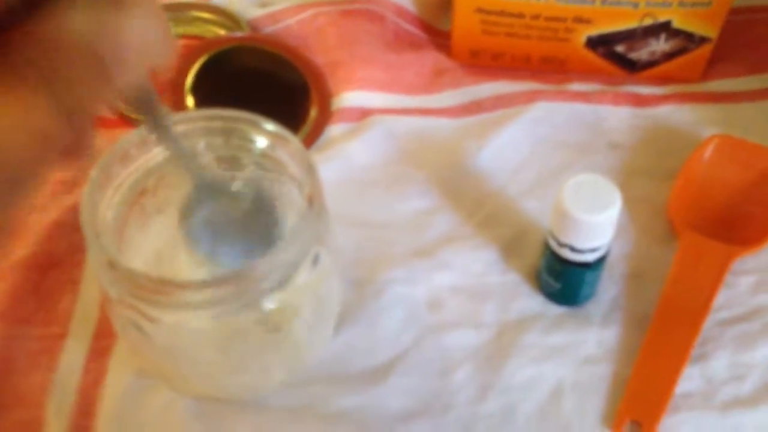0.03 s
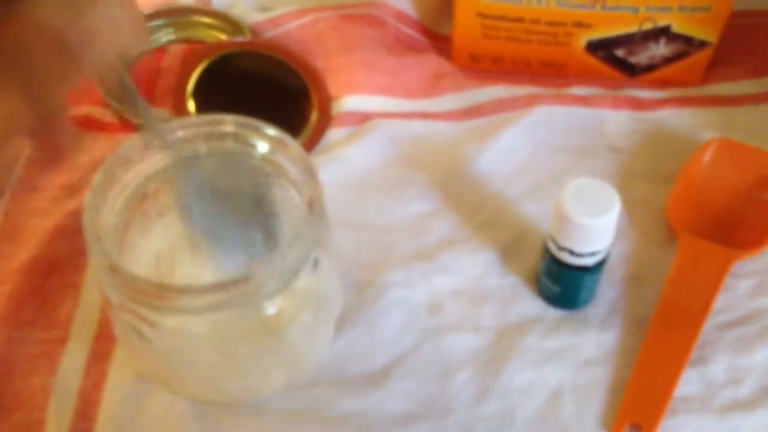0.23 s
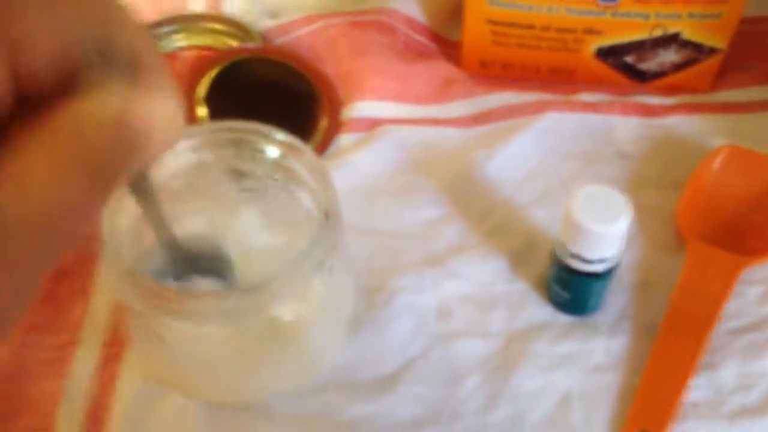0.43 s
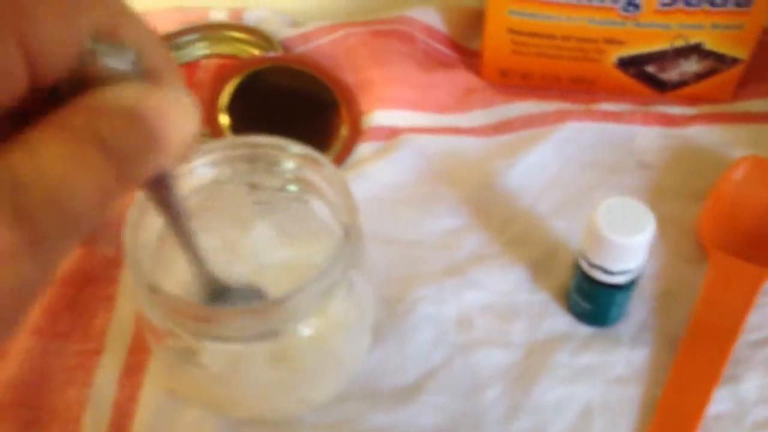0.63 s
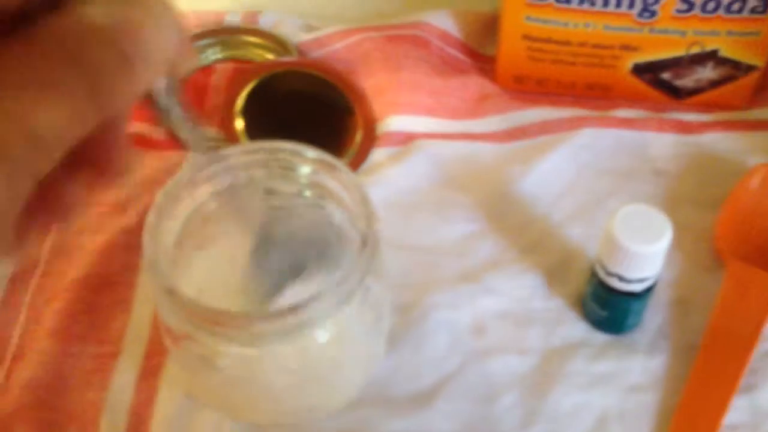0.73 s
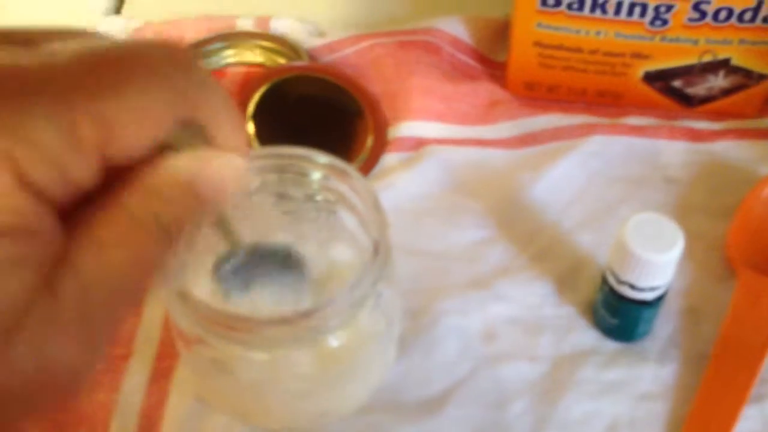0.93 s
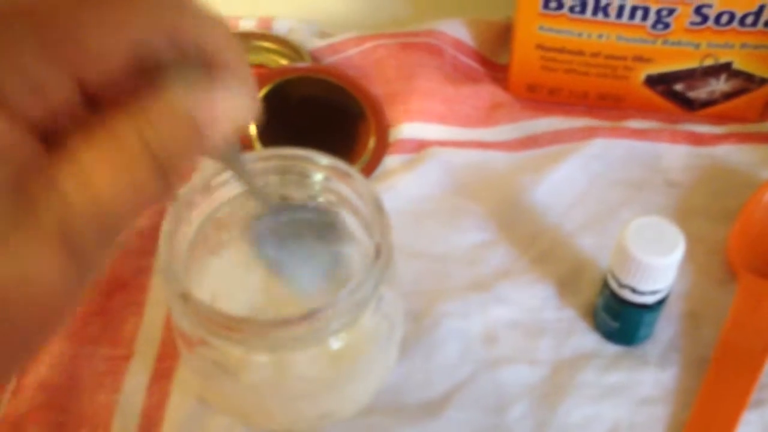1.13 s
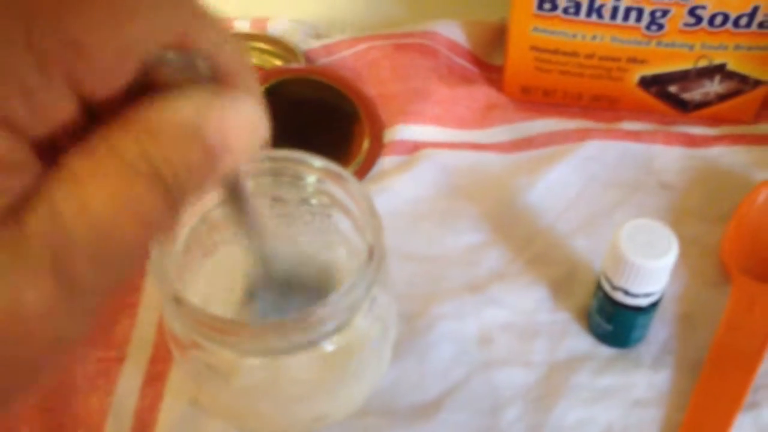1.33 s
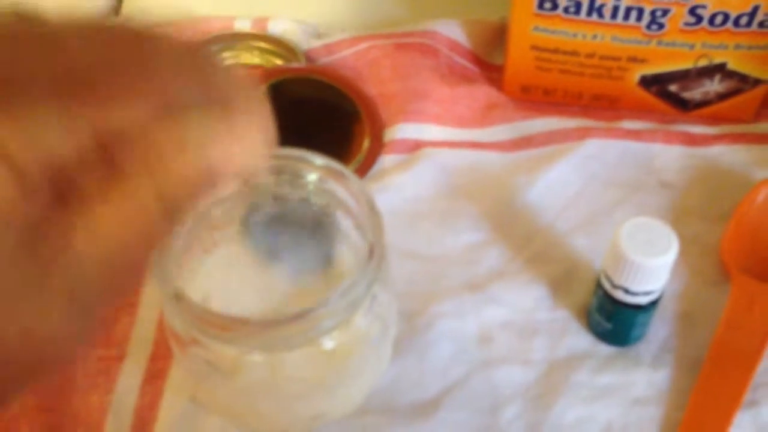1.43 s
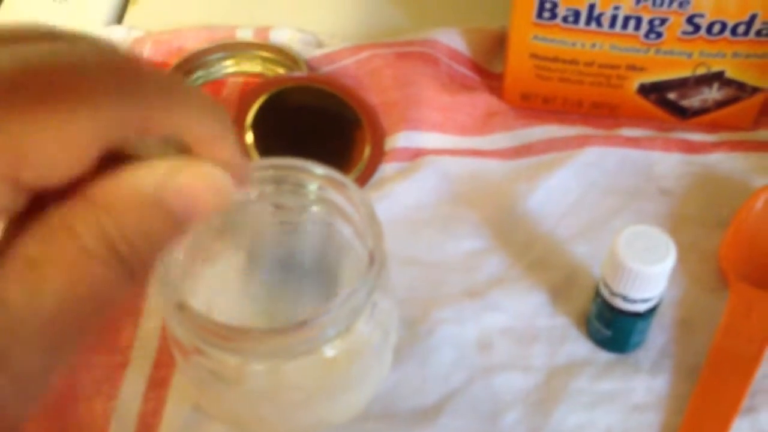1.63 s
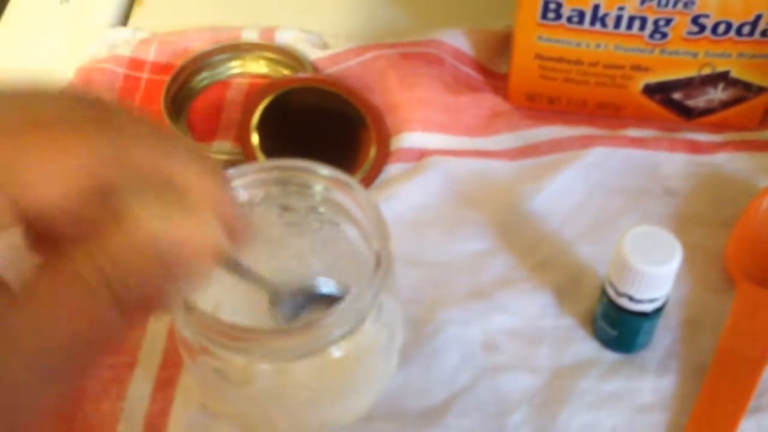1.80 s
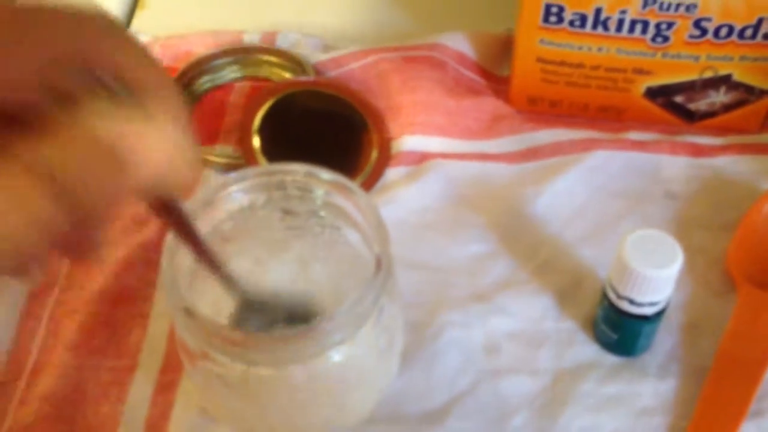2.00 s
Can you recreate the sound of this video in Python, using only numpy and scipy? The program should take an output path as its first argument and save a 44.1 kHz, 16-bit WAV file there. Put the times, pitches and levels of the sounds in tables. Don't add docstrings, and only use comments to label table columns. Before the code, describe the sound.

Steel spoon on a paste-filled glass jar: hard clinks with low table thumps early on, a softer stretch of ticks and gritty scrapes, then two bright hard clinks, heard close in a small room with faint hum.

```python
import sys
import numpy as np
from scipy import signal
from scipy.fft import rfft, irfft
from scipy.io import wavfile
from scipy.ndimage import uniform_filter1d

SR = 44100
rng = np.random.default_rng(int(sys.argv[2]) if len(sys.argv) > 2 else 0)


def how_loud(loudness_db):
    steps = np.asarray(loudness_db, float) / 20
    return 10 ** steps


def dump(signal):
    limited = np.clip(np.atleast_2d(signal).T, -1, 1)
    pcm = np.round(limited * 32767).astype(np.int16)
    wavfile.write(sys.argv[1], SR, pcm)


N = 90801

# f/Hz, level/dB
AIR_COLOUR = [(15, -47.5), (25, -27), (87, 3.5), (256, -10.5), (1190, -17), (1370, -13), (3160, -25.5),
              (14800, -34), (16000, -56)]
# f/Hz, t60/s
KITCHEN_DECAY = [(150, 0.55), (500, 0.24), (2000, 0.26), (6000, 0.15), (14000, 0.19)]
# t/s, level/dB
NEAR_ECHOES = [(.0042, -20), (.009, -23)]

# t/s, level/dB, boom/dB, hollow/dB, softness/ms
THUMPS = [(-.004, -21, -12, -25.5, 0.71), (0.2417, -17.5, -13, -5, 0.38), (0.449, -39, -2, -22, 1.06),
          (0.472, -24, -18, 7, 0.65), (0.505, -21.5, -9, -41, 0.98), (0.688, -21, -11.5, -10, 0.62),
          (0.703, -22, -42, -8, 0.052), (0.98, -34, -10, -8, 0.61), (1.107, -50.5, -15, 8.5, 0.67),
          (1.308, -30, -10, -7, 0.74), (1.477, -40.5, -15.5, 15, 0.38), (1.537, -30.5, -9.5, 3.5, 0.92),
          (1.581, -37, -10, -17, 0.98), (1.652, -65, 20.5, 16.5, 0.22), (1.746, -39.5, -20.5, 14, 0.55),
          (1.78, -30.5, -29.5, -27, 1.44), (1.819, -25.5, -11, -4.5, 0.39), (2.028, -40, -27, -46.5, 0.216),
          (2.034, -32.5, -23.5, -10, 0.08), (0.414, -57, -11, 3, 0.177), (.435, -59, -13, 8, 0.65)]
# f/Hz, level/dB, t60/s
TABLE_BOOM = [(75.6, -36, .3), (82.5, -7.5, 0.62), (97.9, -7.5, 0.61), (120.4, -24.5, 0.4),
              (171.3, -25.5, 0.75)]
# f/Hz, level/dB
TABLE_KNOCK = [(160, -10.5), (200, -6), (270, -20.5), (334, -1.5), (458, -4), (590, -6.5), (660, -2),
               (800, -15.5)]
# f/Hz, level/dB, t60/s
JAR_HOLLOW = [(1020, 0, .028), (1075, -2, .028)]

# t/s, level/dB
STIR_EFFORT = [
    (0.0, -63.5),
    (0.33, -72.5),
    (0.67, -54.5),
    (0.969, -60),
    (1.14, -62.5),
    (1.379, -68),
    (1.71, -64.5),
    (1.78, -62),
    (2.06, -68),
]
# f/Hz, level/dB
PASTE_COLOUR = [(300, -12.5), (600, 11.5), (1000, -4.5), (1800, 6.5), (3000, -7), (6000, -7.5), (9000, -21)]
# t/s, length/ms, level/dB, colour f/Hz
SCRAPES = [(0.4111, 7.8, -53, 12630), (.433, 5.5, -53, 14000), (0.445, 3, -39, 12000),
           (.495, 6, -60, 14500), (0.645, 6.4, -50, 11000), (.895, 7, -50, 9000),
           (0.931, 2.3, -51.5, 11000), (.958, 3.7, -60, 14000), (.971, 2, -66, 13000),
           (.981, 5, -75, 14600), (1.0442, 3.5, -48, 5450), (1.058, 6.1, -60, 13000),
           (1.093, 11, -54, 13000), (1.104, 2.5, -50, 6000), (1.108, 6, -47, 14000),
           (1.294, 10, -50, 12000), (1.296, 8.8, -52, 6900), (1.344, 4.7, -60, 13500),
           (1.394, 14, -55.5, 13000), (1.398, 8.8, -53, 6000), (1.4426, 3.6, -58, 12000),
           (1.463, 3.65, -56.5, 8000), (1.476, 30, -49.5, 11500), (1.536, 6.6, -61, 13500),
           (1.555, 25, -61.5, 11500), (1.604, 25, -51, 6000), (1.643, 22.5, -65, 13000),
           (1.731, 2.53, -63, 8100), (1.777, 3.5, -55, 7960), (1.874, 4.4, -52, 9500),
           (1.883, 4.2, -49, 13000)]
# t/s, f/Hz, level/dB, t60/s
STRUCK_PARTIALS = [(0.2408, 1497, -19.5, 0.028), (0.244, 2690, -29.5, 0.082), (0.245, 3323, -37, 0.034),
                   (.2415, 519, -20, 0.037), (.272, 4700, -46, 0.063), (0, 2320, -60, 0.22),
                   (.472, 1510, -19.5, 0.019), (0.471, 2770, -25, 0.046), (.472, 3680, -16.5, 0.0068),
                   (.472, 4760, -36, 0.092), (.472, 1995, -15.5, 0.014), (.505, 2621, -46, 0.099),
                   (.689, 2092, -19.5, 0.02), (.689, 3470, -19, 0.01), (0.687, 4360, -33.5, 0.02),
                   (.7182, 2370, -36, 0.037), (0.8726, 1730, -42, 0.017), (0.8725, 4352, -35, 0.024),
                   (0.8724, 922, -45, 0.016), (0.89, 3365, -40, .04), (1.0675, 3730, -38.5, .015),
                   (1.0987, 3700, -40, 0.019), (1.3066, 2810, -43.5, 0.0376), (1.4752, 1990, -21.5, 0.021),
                   (1.4753, 4430, -15, 0.027), (1.4753, 8860, -18.5, 0.017), (1.5358, 1497, -37, 0.045),
                   (1.7435, 4470, -15, 0.021), (1.7445, 6010, -19, 0.014), (1.7454, 8970, -19, 0.035),
                   (1.777, 1590, -40, 0.045), (1.818, 2790, -38, 0.023), (1.8171, 7600, -41, 0.02)]

# t/s, level/dB, contact colour f/Hz, wall ring/dB, handle ring/dB
CLINKS = [(-.012, -35, 3600, -10, -57), (0.2412, -9, 3440, -14, -57), (.3676, -35, 4570, -13, -23),
          (.413, -35, 5000, -7, -23), (0.433, -33.5, 4570, -14, -19), (.472, -6.5, 3854, -29, -62),
          (0.689, -12, 2245, -41.5, -55.5), (0.7178, -26, 4200, -22, -50), (0.8731, -19, 4067, -32, -34),
          (0.897, -45, 6100, -3, -34), (1.4753, -8, 4480, -11.5, -30.5), (1.5354, -24.5, 4610, -34.5, -33),
          (1.7439, -3, 8400, -23, -36), (1.8182, -31.5, 2910, -43.5, -24.5)]
# t/s, level/dB, colour f/Hz, wall ring/dB
TICKS = [(0.075, -47.5, 7000, -22), (0.083, -43.5, 9000, -25), (0.229, -43, 10000, -26),
         (0.319, -33.5, 10500, -30), (0.4488, -24, 6000, -32.5), (0.459, -31, 3800, -38),
         (0.6463, -39, 10300, -26), (.917, -45, 7140, -25.5), (.958, -53, 12000, -41),
         (0.9793, -41, 11000, -40), (1.0382, -45, 4200, -11), (1.057, -46, 10000, -29),
         (1.0654, -28.5, 4200, -53), (1.0985, -31.5, 4200, -48), (1.11, -49, 9360, -20.5),
         (1.1222, -37, 5400, -49.5), (1.2956, -36.5, 7000, -40.5), (1.3071, -32, 3300, -21),
         (1.3443, -30.5, 4000, -13.5), (1.396, -43, 6000, -13), (1.437, -51, 5000, -13),
         (1.577, -34, 5000, -39), (1.6032, -28, 6000, -40), (1.622, -44, 12100, -16.5),
         (1.6432, -41, 5900, -29.5), (1.657, -44.5, 12000, -25), (1.777, -39.5, 6000, -5.5),
         (1.863, -44.5, 7600, -27), (1.883, -51, 9000, -35), (2.031, -49.5, 9000, -33.5)]
# f/Hz, level/dB
DAMPED_GLASS = [(1520, 1.5), (2050, -0.5), (2350, -4), (2750, -17), (3500, 3), (3800, 5), (4480, 2),
                (5300, -3.5), (6300, 1), (7550, 9), (8500, 1), (10300, -5), (11800, -3), (13100, -11)]
# f/Hz, level/dB, t60/s
RIM_GLASS = [(3300, 0, .07), (3360, -8, .05), (4590, -19, .08), (2700, -19, .08)]
# f/Hz, level/dB, t60/s
HANDLE = [(8990, -6, .16), (9070, 0, .04)]

AIR_DB, WET_DB = -61.5, -16
SHIFT, RISE_S = 0.015, 0.0004
SCATTER_DB = 1.5
KNOCK_T60_S, GLASS_T60_S = 0.065, 0.024
CLINK_S, TICK_S = 0.0019, 0.0012
SLIDE_S, SLIDE_DB = 0.0031, -24
SETTLE_S, SETTLE_DB, BLUR = 0.0101, -21.5, 0.5
COLOUR_Q, WIDE_SHARE = 0.65, 0.033
BODY_DB, LEAN_DB, SPOT_DB = -13.5, 6, 4
LOW_SHARE = 0.18
TICK_LOW_HZ = 2700
GRIT_DB, GRIT_S, GRIT_PER_S = -32, 0.016, 79
GRAINS_PER_S, SCRAPE_Q, SCRAPE_FADE_DB = 5000, 1.5, -9
CEILING, EDGE_HZ = 0.8, 15500


def evened(x):
    return x / np.sqrt(np.mean(x ** 2) + 1e-20)


def read(points, hz):
    f, value = np.transpose(points)
    return np.interp(np.log(hz + 1), np.log(f + 1), value)


def add(mix, s, sound):
    at = round(s * SR)
    part = mix[max(at, 0):max(at + len(sound), 0)]
    part += sound[max(-at, 0):][:len(part)]


def peak(x, hz, q):
    b, a = signal.iirpeak(hz, q, SR)
    return signal.lfilter(b, a, x)


def passed(x, order, hz, kind):
    return signal.sosfilt(signal.butter(order, hz, kind, fs=SR, output="sos"), x)


def ring(modes, drive, scatter_db, shift=0):
    hz, db, t60 = np.transpose(modes)[:, :, None]
    t = np.arange(SR // 2) / SR
    level_chance, pitch_chance = rng.standard_normal((2, *hz.shape))
    decay = how_loud(db + scatter_db * level_chance - 60 * t / t60)
    body = (decay * np.sin(2 * np.pi * hz * (1 + shift * pitch_chance) * t)).sum(0)
    swelling = body * (1 - np.exp(-t / RISE_S))
    return signal.fftconvolve(swelling, drive / np.linalg.norm(drive))[:len(t)]


def air():
    frames, hz = N // 256 + 5, np.fft.rfftfreq(1024, 1 / SR)
    a, b, patches = rng.standard_normal((frames, 513, 3)).T
    patches = uniform_filter1d(uniform_filter1d(patches, 12, 0), 14, 1)
    level_db = read(AIR_COLOUR, hz)[:, None] + 0.66 * evened(patches)
    noise = signal.istft((a + 1j * b) * how_loud(level_db), nperseg=1024, noverlap=768)[1][:N]
    return how_loud(AIR_DB) * evened(noise)


def kitchen(x):
    taps = np.zeros(SR // 2)
    at = np.arange(200, SR // 2 - 20, 20)
    taps[at + rng.integers(0, 20, len(at))] = rng.choice([-1., 1.], len(at))
    hz, t, z = signal.stft(taps, SR, nperseg=256)
    fade = how_loud(-60 * t / read(KITCHEN_DECAY, hz)[:, None])
    tail = signal.istft(z * fade, SR, nperseg=256)[1]
    tail = how_loud(WET_DB) * tail / np.linalg.norm(tail)
    for s, db in NEAR_ECHOES:
        add(tail, s, how_loud([db]))
    return signal.fftconvolve(passed(x, 2, 200, "high"), tail)[:N]


def table():
    out, t = np.zeros(N), np.arange(400) / SR
    knock_modes = [(f, g, KNOCK_T60_S) for f, g in TABLE_KNOCK]
    for s, db, boom_db, hollow_db, soft_ms in THUMPS:
        push = np.exp(-((1000 * t - 2 * soft_ms) / soft_ms) ** 2)
        knock = 0.13 * ring(knock_modes, push, SCATTER_DB, SHIFT)
        boom = 0.14 * how_loud(boom_db) * ring(TABLE_BOOM, push, 1.0)
        hollow = 0.36 * ring(JAR_HOLLOW, np.hanning(16), 0.2, SHIFT)
        add(out, s - 0.0005, how_loud(db) * (knock + boom))
        add(out, s, how_loud(db + hollow_db) * hollow)
    return out


def paste():
    sizes = how_loud(2.0 * np.minimum(rng.exponential(1, N), 4))
    grains = sizes * rng.standard_normal(N) * (rng.random(N) < 3000 / SR)
    colour = how_loud(read(PASTE_COLOUR, np.fft.rfftfreq(N, 1 / SR)))
    drag = irfft(rfft(grains) * colour, N)
    s, db = np.transpose(STIR_EFFORT)
    return how_loud(np.interp(np.arange(N) / SR, s, db) - 3) * evened(drag)


def scrapes():
    out, t = np.zeros(N), np.arange(2000) / SR
    for s, ms, db, colour_hz in SCRAPES:
        grains = rng.standard_normal(2000) * (0.11 + (rng.random(2000) < GRAINS_PER_S / SR))
        rub = evened(peak(peak(grains, colour_hz, SCRAPE_Q), colour_hz, SCRAPE_Q))
        u = 1000 * t / ms
        gate = np.clip(np.minimum(t / 0.00065, 4 * (1.25 - u)), 0, 1)
        add(out, s, how_loud(db + SCRAPE_FADE_DB * u) * gate * rub)
    return out


def struck_partials():
    out = np.zeros(N)
    for s, hz, db, t60 in STRUCK_PARTIALS:
        add(out, s, ring([(hz, db, t60), (0.73 * hz, db - 13.5, t60)], np.ones(1), 0))
    return out


def chatter(decay_s):
    t = np.arange(SR // 10) / SR
    return rng.standard_normal(len(t)) * np.exp(-t / decay_s) * np.minimum(t / 0.0019, 1)


def contact(decay_s, colour_hz, wall_db, handle_db):
    burst = chatter(decay_s) + how_loud(SETTLE_DB) * chatter(SETTLE_S)
    peak_hz = min(colour_hz, SR / 3)
    snap = peak(peak(burst, peak_hz, COLOUR_Q), peak_hz, COLOUR_Q) + WIDE_SHARE * burst

    body_modes = []
    for f, db in DAMPED_GLASS + [(colour_hz, SPOT_DB)]:
        lean_db = LEAN_DB * abs(np.log2(f / colour_hz))
        body_modes.append((f, db - lean_db, GLASS_T60_S * np.sqrt(2000 / f)))
    out = how_loud(BODY_DB) * ring(body_modes, np.ones(1), SCATTER_DB, SHIFT)
    add(out, 0, 0.15 * snap / np.sqrt(np.mean(snap[:150] ** 2)))
    out = passed(out, 3, LOW_SHARE * colour_hz, "high")

    wobble = uniform_filter1d(rng.standard_normal(len(out)), size=200)
    flutter = 1 + BLUR * evened(uniform_filter1d(wobble, size=200))
    wall = how_loud(wall_db) * ring(RIM_GLASS, np.ones(1), 0.37, SHIFT / 4)
    handle = how_loud(handle_db) * ring(HANDLE, np.ones(1), 0.5, SHIFT / 4)
    return out + flutter * (wall + handle)


def clinks():
    out = np.zeros(N)
    for s, db, *colour_and_rings in CLINKS:
        add(out, s, how_loud(db) * contact(CLINK_S, *colour_and_rings))
        slide = peak(chatter(SLIDE_S), 2500, 1.2)[::-1]
        add(out, s - len(slide) / SR, how_loud(db + SLIDE_DB) * slide)
    return out


def ticks():
    out, t = np.zeros(N), np.arange(2000) / SR
    for s, db, colour_hz, ring_db in TICKS:
        crushed = rng.standard_normal(2000) * (rng.random(2000) < GRIT_PER_S / SR)
        grit = how_loud(GRIT_DB) * np.exp(-t / GRIT_S) * crushed
        tick = contact(TICK_S, colour_hz, ring_db, ring_db - 24.5)[:6000]
        tick = passed(tick, 3, TICK_LOW_HZ, "high")
        add(out, s, how_loud(db) * signal.fftconvolve(tick, grit + (t == 0)))
    return out


def scene():
    near = table() + paste() + scrapes() + struck_partials() + clinks() + ticks()
    return (near + kitchen(near) + air())[None]


def band_limit(x):
    return signal.sosfilt(signal.butter(12, 16560, fs=SR, output="sos"), x)


def record(dry):
    x = passed(dry, 5, 66, "high")
    x = x + 0.42 * passed(x, 2, 9500, "low")
    x = CEILING * np.tanh(x / CEILING)
    band = signal.firwin(63, EDGE_HZ, window=("kaiser", 7), fs=SR)
    mix = signal.oaconvolve(x, band[None], "same")
    return band_limit(mix)


dry = scene()
out = record(dry)
dump(out)
```